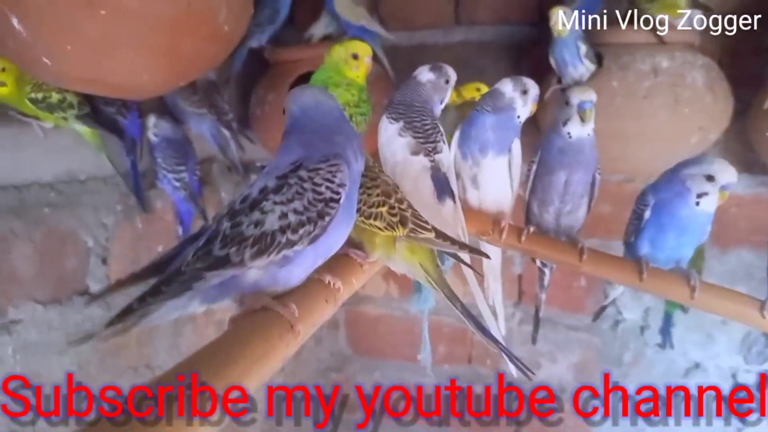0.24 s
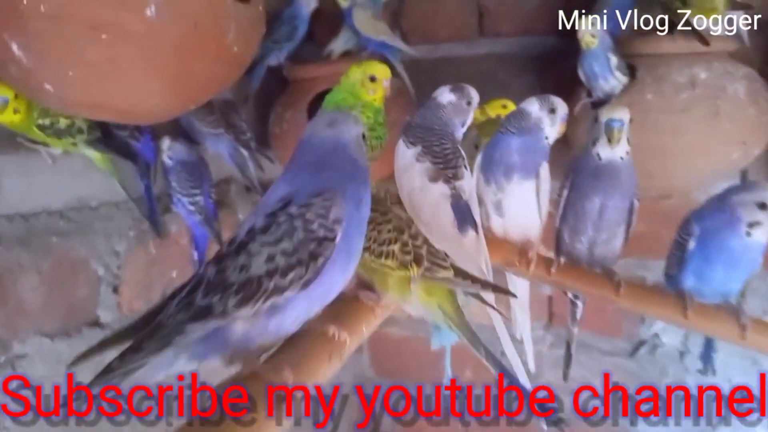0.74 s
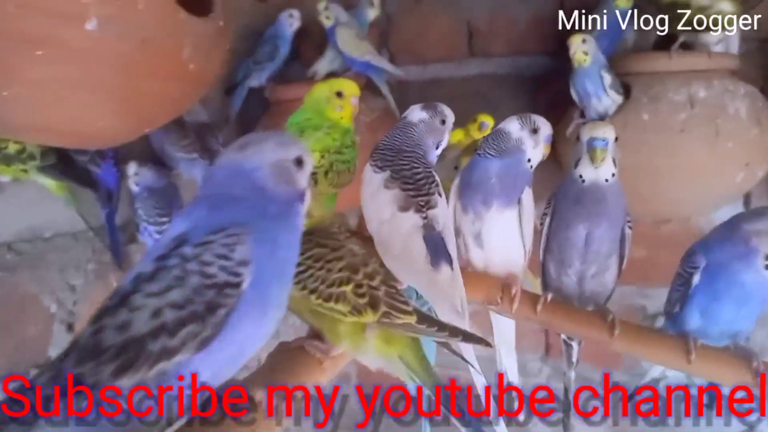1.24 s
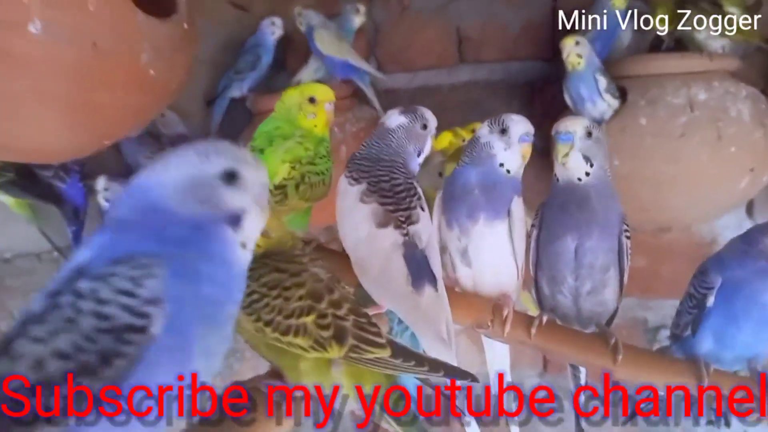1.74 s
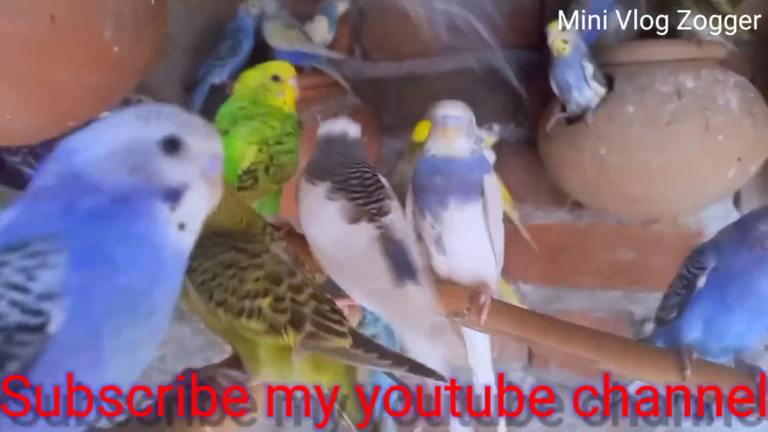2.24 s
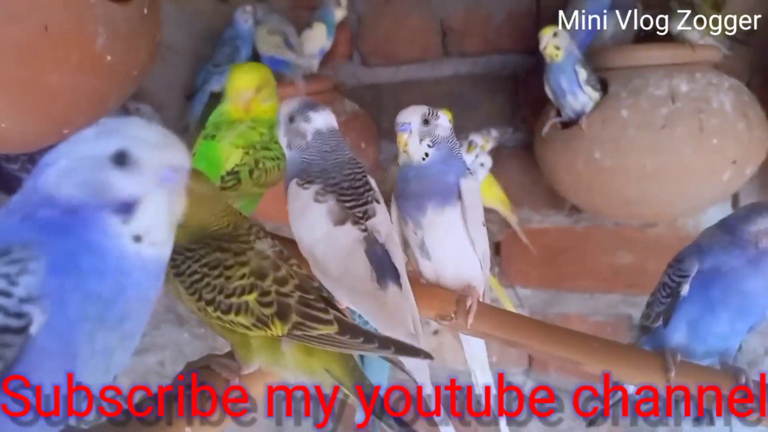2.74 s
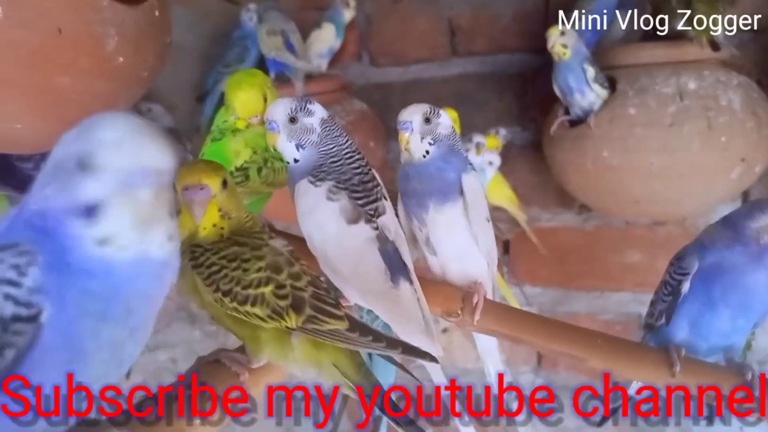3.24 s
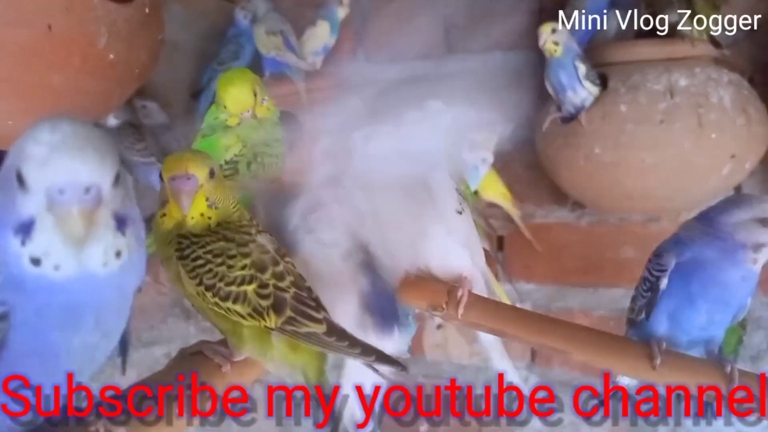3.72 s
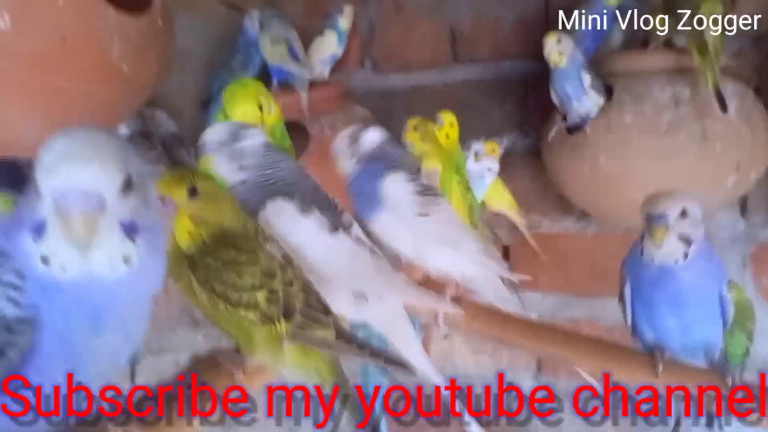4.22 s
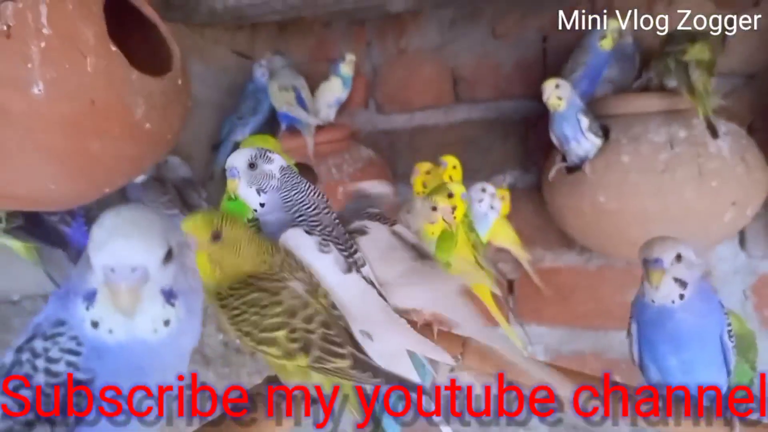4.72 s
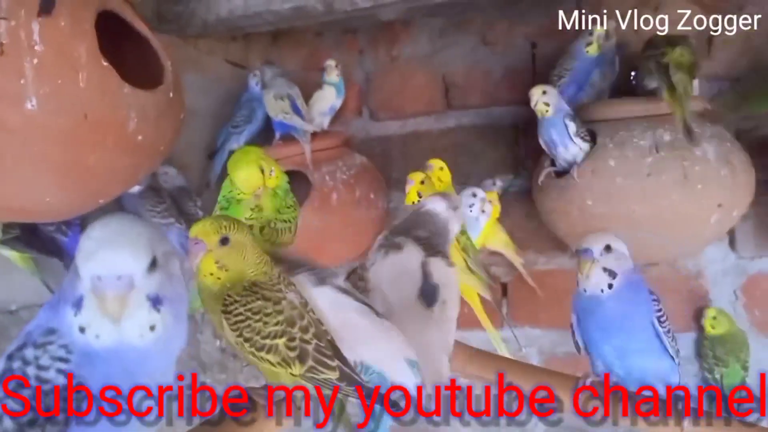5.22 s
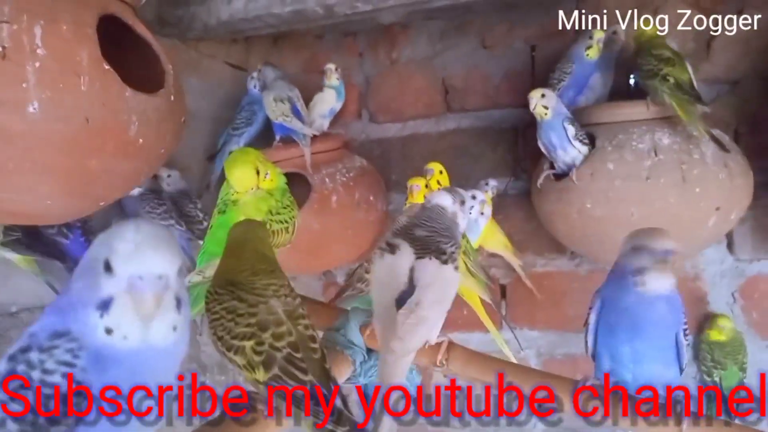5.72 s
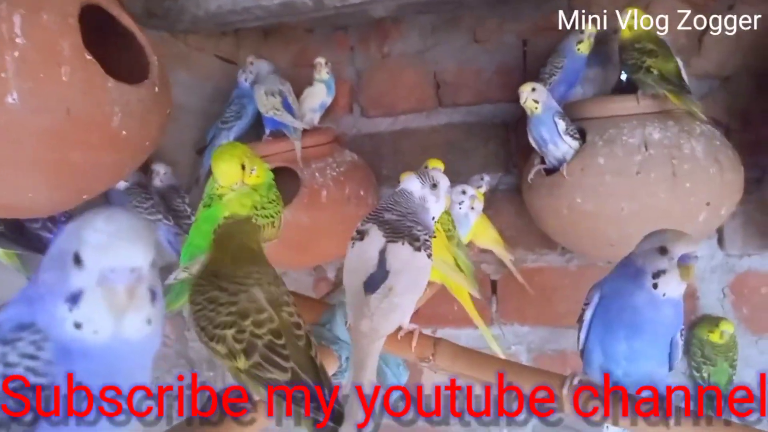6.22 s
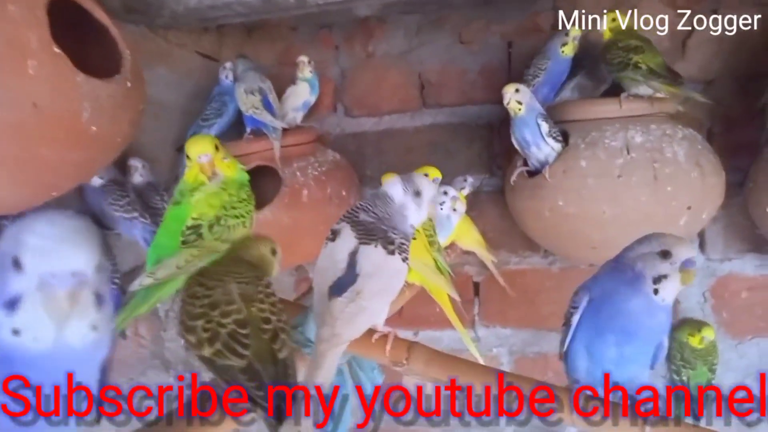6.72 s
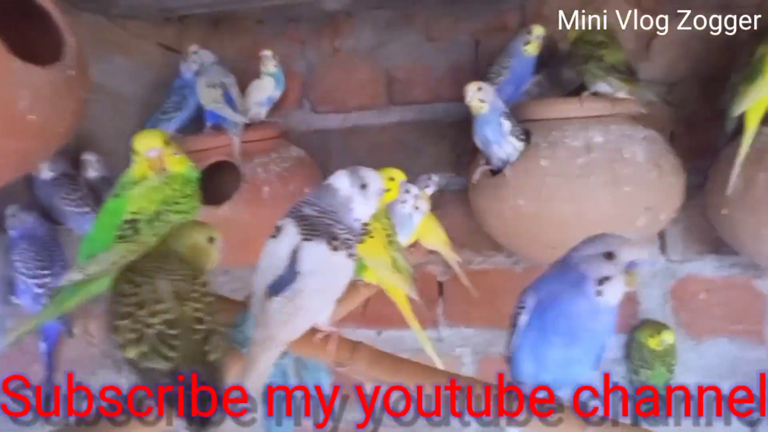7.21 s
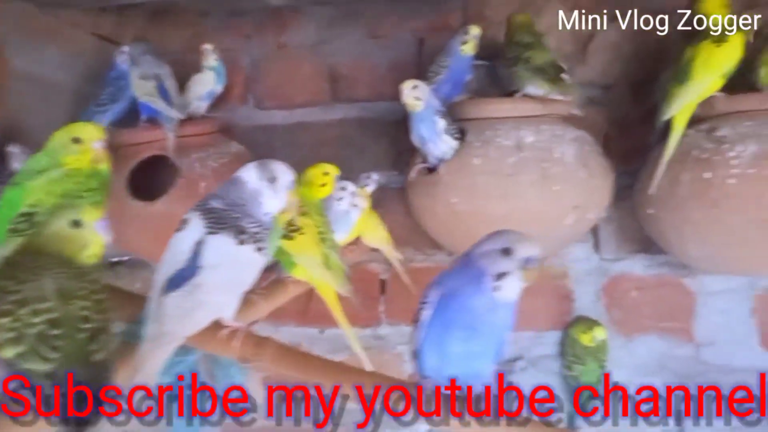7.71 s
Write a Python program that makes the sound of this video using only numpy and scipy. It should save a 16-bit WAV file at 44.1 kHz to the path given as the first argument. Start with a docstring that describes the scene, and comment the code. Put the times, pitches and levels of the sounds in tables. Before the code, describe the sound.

Close-up small parrots chirp and squawk busily over fainter flock calls and wing flutters, until only a few very faint notes remain.

```python
"""A flock of budgerigars chatters in a small brick aviary: gliding chirps and warbles, summed from sine partials,
overlap with harsh squawks made of shaped noise and a ragged whistle. Other birds call from farther back.
Birds flutter between perches and scratch on wood and clay pots: shaped noise, and decaying sines for the pots.
Brick walls and cage wires answer at close range, over a faint rumble and hiss; the microphone cuts the top treble.
After six seconds only a few soft calls are left."""
import sys
import numpy as np
from scipy import signal
from scipy.fft import rfft, irfft, next_fast_len
from scipy.io import wavfile
from scipy.ndimage import uniform_filter1d, map_coordinates

SR = 44100
rng = np.random.default_rng(int(sys.argv[2]) if len(sys.argv) > 2 else 0)


def log_audio(samples):
    """Write samples as a 16-bit WAV file to the path given in sys.argv[1]."""
    # one column per channel
    frames = np.atleast_2d(samples).T
    # limit to full scale, then quantise
    limited = np.clip(frames, -1, 1)
    pcm = np.round(limited * 32767).astype(np.int16)
    wavfile.write(sys.argv[1], SR, pcm)


N = 351036  # samples

# Levels are relative: the share sent to the walls and the balance in scene() come on top.
# Single chirps that stand out. Each row: start in seconds, nominal length in seconds, middle pitch in Hz,
# level in dB, name of the syllable.
CHIRPS = [(0, 0.042, 3480, -33.5, "arch"), (.34, 0.082, 2764, -43, "arch"), (.61, 0.056, 2850, -49, "sag"),
          (.675, 0.043, 2820, -38, "fall"), (.72, 0.058, 2600, -45.5, "arch"),
          (.9, 0.01, 3035, -27.5, "hold"), (.911, 0.025, 4030, -26.5, "fall"),
          (.931, 0.019, 2940, -21, "sag"), (.964, 0.0091, 2340, -21, "dip"),
          (.974, 0.029, 3020, -21, "rise"), (.996, 0.028, 3415, -37, "sag"),
          (1.13, 0.037, 2320, -39.5, "hold"), (1.175, 0.035, 3184, -35, "dip"),
          (1.205, 0.031, 4260, -38, "rise"), (1.352, 0.067, 2250, -32, "swoop"),
          (1.425, .05, 2266, -39.5, "hold"), (1.48, 0.16, 1480, -47.5, "swoop"),
          (1.56, 0.076, 3074, -29.5, "burr"), (1.64, 0.05, 3004, -31, "burr"),
          (1.74, 0.11, 2553, -32.5, "burr"), (2.093, 0.023, 3846, -23, "arch"),
          (2.14, 0.023, 2680, -20.5, "dip"), (2.36, 0.035, 2240, -41, "rise"),
          (2.45, .13, 1473, -50.5, "sag"), (2.755, 0.064, 3387, -33.5, "burr"),
          (2.857, 0.012, 2830, -22.5, "hold"), (2.872, 0.045, 3630, -26.5, "sag"),
          (2.895, 0.015, 2900, -19, "hold"), (2.925, .016, 2380, -22.5, "dip"),
          (2.94, .02, 2825, -19.5, "sag"), (2.96, 0.039, 3244, -24.5, "burr"),
          (3.285, .018, 2244, -37.5, "rise"), (3.563, 0.052, 3370, -35, "burr"),
          (3.62, .055, 3210, -37.5, "burr"), (3.685, 0.024, 2417, -39, "swoop"),
          (3.72, 0.063, 2080, -34.5, "hold"), (3.78, 0.035, 3460, -31, "sag"),
          (3.836, 0.019, 3350, -27, "hold"), (3.858, .068, 2854, -44, "fall"),
          (3.933, .036, 3106, -32, "dip"), (3.97, 0.031, 2730, -35, "rise"),
          (4.14, 0.083, 2633, -29, "burr"), (4.335, 0.038, 3570, -32, "sag"),
          (4.455, 0.027, 2300, -28, "dip"), (4.765, 0.042, 1381, -44, "hold"),
          (4.817, 0.0076, 3660, -30.5, "hold"), (5.01, 0.053, 2863, -30, "arch"),
          (5.165, 0.025, 3000, -35.5, "arch"), (5.47, 0.062, 1500, -51, "swoop"),
          (5.748, 0.011, 2430, -25.5, "hold"), (5.775, 0.035, 2894, -31, "arch"),
          (6.045, 0.066, 2100, -51.5, "swoop"), (6.09, .035, 1945, -44.5, "rise"),
          (6.118, 0.048, 2440, -37.5, "arch"), (6.188, 0.043, 2488, -33.5, "arch"),
          (6.218, 0.026, 2960, -37.5, "rise"), (7.135, 0.02, 2480, -51.5, "dip"),
          (7.163, 0.0417, 2083, -51.5, "dip"), (7.205, 0.053, 3010, -53, "sag"),
          (7.39, 0.062, 2835, -70, "rise")]
# Lower, nasal calls with strong overtones. Each row: start in seconds, nominal length in seconds,
# middle pitch in Hz, level in dB, name of the syllable.
NASAL_CALLS = [(.11, 0.035, 2600, -35.5, "hold"), (.295, 0.054, 1900, -50, "fall"),
               (.43, 0.043, 1330, -54.5, "fall"), (2.5, 0.17, 801, -49, "sag"),
               (3.41, 0.0275, 2080, -38, "hold"), (3.48, 0.028, 2154, -33.5, "hold"),
               (4.745, 0.13, 910, -51, "hold"), (7.208, 0.0373, 769, -57.5, "sag"),
               (7.765, .03, 1850, -55, "rise"), (7.792, 0.0756, 1400, -52.5, "sag"),
               (7.9, 0.035, 2000, -50, "hold")]
# The syllables of a budgerigar. Each name: start and end in semitones from the middle pitch, roughness from 0 to 1.
SYLLABLES = {"swoop": (4.6, -3.5, .08), "fall": (3.2, -2.5, .16), "sag": (1.4, -0.8, 0.2),
             "rise": (-2.6, 2, 0.14), "arch": (-2.6, -2.4, 0.27), "dip": (3.4, 3.4, 0.11),
             "hold": (-0.47, -0.28, 0.16), "burr": (0, -0.8, .45)}
# Warbles, quick runs of arches and dips. Each row: start in seconds, length in seconds, central pitch in Hz,
# level in dB.
WARBLES = [(1.962, 0.062, 2890, -29.5), (2.041, .14, 2814, -26), (2.604, 0.17, 2588, -33),
           (2.994, .15, 2319, -35.5), (3.147, 0.11, 1523, -48), (4.365, 0.052, 2773, -31.5),
           (4.571, .12, 2400, -35), (5.666, 0.076, 2578, -34.5), (6.375, 0.18, 2457, -66)]
WARBLE_SYLLABLE_S, WARBLE_ROUGHNESS = .029, 0.29  # nominal seconds, 0-1
WARBLE_SWING, WARBLE_DRIFT = 1.5, .6  # semitones
# The throat and beak favour some partials. Each row: frequency in Hz, gain in dB.
THROAT = [(600, 0), (1300, 8.5), (2100, 11.5), (3000, 7), (4200, 2), (5600, -7.5), (6800, -8.5),
          (9000, -11.5), (11500, -39), (14500, -23), (17000, -17.5)]
# Squawks. Each row: onset in seconds, nominal length in seconds, whistle pitch in Hz, level in dB, name of the voice.
SQUAWKS = [(.108, .05, 5265, -39, "shrill"), (0.906, 0.055, 7540, -38, "shrill"),
           (1.076, .064, 6570, -29, "full"), (1.255, 0.058, 4840, -30, "shrill"),
           (1.379, 0.046, 6020, -30, "hoarse"), (1.49, .031, 4190, -29.5, "full"),
           (1.677, 0.048, 5425, -33, "shrill"), (1.763, 0.083, 4930, -31, "full"),
           (1.873, 0.083, 4165, -26, "full"), (2.004, 0.083, 4200, -30.5, "hoarse"),
           (2.202, 0.083, 5040, -26, "full"), (2.849, 0.13, 5390, -39, "hoarse"),
           (4.062, 0.096, 5710, -26, "hoarse"), (4.21, .11, 6150, -24, "full"),
           (4.375, 0.078, 6270, -25.5, "full"), (4.415, 0.16, 6130, -29.5, "hoarse"),
           (4.584, .14, 5580, -27, "hoarse"), (4.857, .11, 6220, -23.5, "full"),
           (5.008, .1, 6080, -25, "full"), (5.099, 0.14, 4900, -27, "hoarse"),
           (5.197, 0.12, 6330, -24.5, "full"), (5.367, 0.086, 6325, -25, "full"),
           (5.539, 0.1, 6170, -25, "shrill"), (5.652, 0.062, 7080, -27.5, "full"),
           (5.814, 0.071, 6045, -28, "shrill"), (5.957, .073, 6030, -31, "full")]
# How a squawk is voiced. Each name: whistle over rasp in dB.
VOICES = {"shrill": 7.7, "full": 0, "hoarse": -5.5}
# Spectrum of the squawks' rasp. Each row: frequency in Hz, relative level in dB.
RASP = [(600, -47.5), (1300, -36), (2200, -9), (3000, -1.5), (4200, -2.5), (5600, 0.5), (6700, -4),
        (7800, -12), (9600, -14), (11500, -30), (12800, -26.5), (14500, -16.5), (16000, -26.5)]
# The birds farther back. Each row: time in seconds, level in dB.
FLOCK = [(0.0, -53), (0.38, -57.5), (0.97, -52.5), (1.06, -48.5), (2.08, -33), (2.39, -35), (2.61, -44.5),
         (2.86, -33), (3.26, -49), (3.48, -40.5), (3.68, -38), (4.34, -32), (4.83, -38), (5.08, -31.5),
         (6.08, -54.5), (6.27, -74), (6.85, -84.5), (7.96, -58.5)]
# Bouts of flapping. Each row: start in seconds, length in seconds, pushed air in dB, feather swish in dB.
FLUTTERS = [(1.963, 0.41, -58, -72.5), (2.975, .05, -55, -55), (3.02, 0.2, -63, -48),
            (3.13, 0.32, -53, -50.5), (3.347, 0.97, -64.5, -63), (3.999, .44, -58.5, -60),
            (4.377, .22, -62, -59), (4.501, 0.49, -58.5, -67), (4.953, 0.89, -64, -69.5),
            (5.652, 0.49, -62.5, -73.5)]
# Spectrum of the air pushed by a wing. Each row: frequency in Hz, relative level in dB.
WING_AIR = [(20, -21), (45, -15.5), (70, 7), (110, -3.5), (170, -14.5), (300, -21.5), (800, -77.5)]
# Spectrum of the feathers' swish. Each row: frequency in Hz, relative level in dB.
FEATHERS = [(80, -17), (170, -1), (260, -10), (420, 4.5), (700, -2), (1500, 5.5), (4000, -25.5),
            (9000, -28), (16000, -37.5)]
# Claws and feathers brush perches and pots. Each row: start in seconds, nominal length in seconds, level in dB.
SCRATCHES = [(0.498, 0.038, -69), (0.802, 0.032, -56), (3.228, 0.067, -47), (3.559, 0.02, -36.5),
             (3.752, 0.18, -42.5), (6.283, 0.21, -79), (6.503, 0.038, -69), (6.725, .13, -72),
             (6.97, 0.037, -66), (7.479, 0.038, -68.5), (7.551, 0.056, -70), (7.638, 0.054, -61)]
# Spectrum of a scratch. Each row: frequency in Hz, relative level in dB.
CLAWS = [(200, -37.5), (500, -19), (1200, -12), (2400, 14), (4500, 0.5), (9000, -16.5), (16000, -28)]
# Birds land on the pots, which ring hollowly. Each row: start in seconds, level in dB.
LANDINGS = [(3.124, -58), (3.26, -39), (3.313, -47), (4.46, -43.5), (4.509, -43.5)]
# Modes of a pot of middling size. Each row: frequency in Hz, level in dB, time to fall 60 dB in seconds.
POT = [(422, -0.5, .13), (312, -8, 0.11), (580, -8, 0.084), (164, -6.5, 0.2)]
# Decay of the aviary's echo. Each row: frequency in Hz, time to fall 60 dB in seconds.
ROOM = [(200, 0.073), (2500, 0.16), (7000, 0.12), (15000, 0.046)]
# Spectrum of the surroundings. Each row: frequency in Hz, relative level in dB.
AMBIENT = [(45, -19.5), (70, -4), (90, 2), (115, -5), (200, -12.5), (400, -14), (800, -14.5), (1400, -26),
           (2400, -25.5), (4000, -26), (8000, -36), (16000, -43.5)]
TOP_HZ = 15650  # middle of the microphone's upper band edge


def syllables(table):
    """Each syllable bends around its own pitch: rows (s, length, start Hz, middle Hz, end Hz, dB, roughness)."""
    rows = []
    for s, length, hz, db, name in table:
        start, end, rough = SYLLABLES[name]
        rows.append((s, length, hz * interval(start), hz, hz * interval(end), db, rough))
    return rows


def warbles(scatter_db=-1.5):
    """A warble swings up and down around its pitch, one arch or dip after another, no two quite alike."""
    rows = []
    for s, length, hz, db in WARBLES:
        count = max(round(length / WARBLE_SYLLABLE_S), 1)
        for i, (drift, tilt, strength) in enumerate(rng.standard_normal((count, 3))):
            swing = WARBLE_SWING * (-1) ** i * np.array([-1, 1, -1])
            wander = WARBLE_DRIFT * (drift + tilt * np.array([-1, 0, 1]))
            pitches = hz * interval(swing + wander)
            start = s + i * length / count
            level_db = db + scatter_db * strength
            rows.append((start, WARBLE_SYLLABLE_S, *pitches, level_db, WARBLE_ROUGHNESS))
    return rows


def chirp(length, start_hz, middle_hz, end_hz, rough, slope_db=-9, jitter=0.21, shimmer_db=6.0):
    """One glide of the syrinx; a rough membrane shakes in pitch and strength, and each partial flickers."""
    u, envelope = swell(length, rise=0.0044, fall=0.0028)
    # a parabola in log pitch through start, middle and end
    glide = np.polyfit([0, .5, 1], np.log([start_hz, middle_hz, end_hz]), 2)
    hz = np.exp(np.polyval(glide, u))
    hz = hz * np.exp(.016 * wobble(123.4, len(u)) + jitter * rough * wobble(1100, len(u)))
    k = np.arange(1, 9)[:, None]  # partial numbers
    flicker_db = wobble(110, len(k) * len(u)).reshape(len(k), -1) * np.where(k > 1, 5, 3)
    partials = amp(along(THROAT, k * hz) + slope_db * np.log2(k) + flicker_db)
    partials = partials * (k * hz < SR / 2)
    phase = 2 * np.pi * np.cumsum(hz) / SR
    voice = np.sum(partials * np.sin(k * phase), axis=0)
    shimmer = amp(shimmer_db * rough * wobble(450, len(u)))
    return envelope * unit(voice * (1.2 + np.sin(np.pi * u)) * shimmer)


def calls(table, slope_db, even_db=-46, distance_db=0.5, bounce=0.34, bounce_s=0.0062):
    """Direct sound and the share sent to the walls: weak calls come from farther off and are wetter."""
    direct, sent = np.zeros(N), np.zeros(N)
    for s, length, start_hz, middle_hz, end_hz, db, rough in table:
        call = amp(db) * chirp(length, start_hz, middle_hz, end_hz, rough, slope_db)
        angle = np.arctan(amp(distance_db * (even_db - db)))  # equal shares at even_db
        add(direct, s, np.cos(angle) * call)
        # the nearest wall's late copy beats against the glide
        add(direct, s + bounce_s * rng.uniform(0.4, 2), bounce * np.cos(angle) * call)
        add(sent, s, np.sin(angle) * call)
    return direct, sent


def squawks(buzz_rate=420, buzz_db=1.5, spread=0.047, arch=.07, opening=0.16, lower_db=-11, upper_db=-19):
    """A hard-driven syrinx sputters: broad rasp and a ragged whistle on the second partial.
    As the beak opens and closes, the call swells and its resonances rise and fall."""
    out = np.zeros(N)
    rasp = unit(patchy(noise(RASP), 5.5))
    for s, length, whistle_hz, db, voice in SQUAWKS:
        u, envelope = swell(length + 0.0073, rise=0.008, fall=.022)
        beak = np.abs(np.sin(np.pi * u ** 0.95))
        raggedness = 0.0158 * wobble(90, len(u)) + spread * wobble(1900, len(u))
        hz = whistle_hz * (1 + arch * (beak - .7) + raggedness)
        phase = np.pi * np.cumsum(hz) / SR  # of the first partial, an octave below the whistle
        whistle = np.sin(2 * phase) + amp(lower_db) * np.sin(phase) + amp(upper_db) * np.sin(3 * phase)
        whistle = unit(whistle * (0.17 + beak) * amp(3.8 * wobble(260, len(u))))
        # reading the rasp faster or slower moves its resonances up or down
        place = np.cumsum(1 + opening * (beak - .75))
        hiss = map_coordinates(rasp[int(s * SR):][:2 * len(u)], [place])
        hiss = unit(hiss * (1.1 + beak))
        sputter = unit(amp(buzz_db * wobble(buzz_rate, len(u))))
        cry = unit(hiss + amp(VOICES[voice]) * whistle)
        add(out, s - .008, amp(db) * envelope * sputter * cry)
    return out


def far_chirps(count=190, pitch_hz=2650, range_share=0.14, glide=0.19, rough=0.17):
    """Birds farther back call at random, each at its own pitch."""
    out = np.zeros(N)
    for i, (when, length, db, pitch, *bend) in enumerate(rng.standard_normal((count, 7))):
        pitches = pitch_hz * np.exp(range_share * pitch + glide * np.array(bend))
        call = chirp(.033 * np.exp(.3 * length), *pitches, rough, slope_db=-4)
        level_db = 2 * db + 2 * along(THROAT, pitches.min())
        add(out, (i + when / 2) * N / SR / count, amp(level_db) * call)
    return unit(out) * amp(curves(FLOCK)[0])


def far_mutters(count=48, pitch_hz=1250, range_share=.25, glide=.08, rough=.2, length_s=.04, follow=.45, level_db=-60):
    """Low nasal notes from farther back, a little louder when the flock is busy."""
    out = np.zeros(N)
    for i, (when, length, pitch, fall) in enumerate(rng.standard_normal((count, 4))):
        pitches = pitch_hz * np.exp(range_share * pitch + glide * (1 + fall) * np.array([1, 0, -1]))
        note = chirp(length_s * np.exp(.3 * length), *pitches, rough, slope_db=2)
        add(out, (i + when / 2) * N / SR / count, note)
    flock_db = curves(FLOCK)[0]
    busy_db = follow * (flock_db - np.median(flock_db)) + level_db
    return unit(out) * amp(np.minimum(busy_db, flock_db - 10.5))


def wings(beat_rate=16.2, air_beat_db=5, swish_beat_db=2.0, uneven_db=4.5, uneven_rate=22):
    """Every wingbeat pushes air, no two equally hard; the feathers swish. A bout swells and fades as the bird passes."""
    out = np.zeros(N)
    for s, length, air_db, swish_db in FLUTTERS:
        u = np.linspace(0, 1, int(length * SR))
        beats_per_s = beat_rate * (1 + 0.13 * wobble(9.6, len(u)))
        stroke = np.cos(2 * np.pi * np.cumsum(beats_per_s) / SR)
        effort = amp(uneven_db * wobble(uneven_rate, len(u)))
        puffs = effort * amp(air_beat_db * stroke) * coloured(rng.standard_normal(len(u)), WING_AIR)
        air = amp(air_db) * unit(puffs)
        feathers = coloured(patchy(rng.standard_normal(len(u)), 6), FEATHERS)
        swish = amp(swish_db) * unit(amp(swish_beat_db * stroke) * feathers)
        add(out, s, np.sin(np.pi * u) * (air + swish))
    return out


def scratches(grain_rate=300, grain_db=4):
    """A claw or feather catches and slips many times in each stroke."""
    out = np.zeros(N)
    for s, length, db in SCRATCHES:
        u, envelope = swell(length, rise=0.0086, fall=0.019)
        slips = patchy(rng.standard_normal(len(u)), 4.3) * amp(grain_db * wobble(grain_rate, len(u)))
        add(out, s, amp(db) * envelope * coloured(slips, CLAWS))
    return out


def landings(attack=0.0018):
    """Soft feet set a clay pot ringing; its size, and so its pitch, varies a little between landings."""
    out = np.zeros(N)
    t = np.arange(SR // 4) / SR
    for s, db in LANDINGS:
        size = np.exp(0.039 * rng.standard_normal())
        ring = sum(amp(level - 60 * t / t60) * np.sin(2 * np.pi * hz / size * t) for hz, level, t60 in POT)
        add(out, s, amp(db) * (1 - np.exp(-t / attack)) * ring)
    return out


def aviary(x, count=48, first_echo=0.0036):
    """Close brick walls and hollow pots answer; the echo changes as the birds move about."""
    out = np.zeros(N)
    edges = np.linspace(0, N, count + 1).astype(int)
    step = edges[1]
    for edge in edges:
        hz, t, z = signal.stft(patchy(rng.standard_normal(SR // 4), 7), SR, nperseg=256)
        decay = amp(-60 * t / along(ROOM, hz)[:, None])
        tail = signal.istft(z * decay, SR, nperseg=256)[1]
        # each stretch fades into the next, which has a tail of its own
        i = np.arange(max(edge - step, 0), min(edge + step, N))
        part = x[i] * np.cos(np.pi / 2 * (i - edge) / step)
        add(out, i[0] / SR + first_echo, signal.fftconvolve(part, tail / np.linalg.norm(tail)))
    return out


def wires(x, count=30, low_hz=3300, high_hz=10500, t60=0.14, level_db=-11):
    """The cage wires ring briefly in sympathy whenever a partial sweeps past one of their pitches."""
    t = np.arange(SR // 4) / SR
    place, turn = rng.random((2, count, 1))
    hz = low_hz * (high_hz / low_hz) ** ((np.arange(count)[:, None] + place) / count)
    ring = np.sum(np.sin(2 * np.pi * (hz * t + turn)), axis=0) * amp(-60 * t / t60)
    return amp(level_db) * signal.fftconvolve(x, ring / np.linalg.norm(ring))[:N]


def background():
    """The faint rumble and hiss of the surroundings: steady noise, strongest in the bass."""
    return amp(-83) * noise(AMBIENT)


def amp(db):
    """Amplitude factor of a level in dB."""
    return 10 ** (np.asarray(db) / 20)


def interval(semitones):
    """Frequency ratio of a pitch step."""
    return 2 ** (semitones / 12)


def unit(x):
    """x scaled to rms 1."""
    return x / np.sqrt(np.mean(x ** 2) + 1e-20)


def along(points, hz):
    """Values at hz, read between (Hz, value) points on a log axis."""
    f, v = np.transpose(points)
    return np.interp(np.log(hz + 1), np.log(f), v)


def curves(rows):
    """One value per sample for each column after the time."""
    s, *cols = np.transpose(rows)
    return [np.interp(np.arange(N) / SR, s, c) for c in cols]


def wobble(rate, size):
    """A smooth random curve, rate knots a second."""
    knots = np.random.default_rng(rng.integers(2 ** 31)).standard_normal(int(size * rate / SR) + 4)
    return map_coordinates(knots, [np.arange(size) * rate / SR], mode="nearest")


def swell(length, rise, fall):
    """Progress 0-1 through a call, and its envelope."""
    t = np.arange(int((max(length, rise) + fall / 2) * SR)) / SR
    edge = np.clip(t / rise, 0, 1) * np.clip((t[-1] - t) / fall, 0, 1)
    return t / t[-1], np.sin(np.pi / 2 * edge) ** 2


def coloured(x, spectrum):
    """x shaped by a spectrum, at rms 1."""
    m = next_fast_len(len(x) + 2048)
    gain = amp(along(spectrum, np.fft.rfftfreq(m, 1 / SR)))
    return unit(irfft(rfft(x, m) * gain, m)[:len(x)])


def noise(spectrum):
    """Steady noise of rms 1."""
    return coloured(rng.standard_normal(N), spectrum)


def patchy(x, depth_db, order=3):
    """Random peaks and troughs, a few hundred Hz wide and some 20 ms long."""
    z = signal.stft(x, nperseg=256)[2]
    field = rng.standard_normal(z.shape)
    for _ in range(2):
        field = uniform_filter1d(uniform_filter1d(field, order, axis=0), 2 * order, axis=1)
    gain = amp(depth_db * np.clip(unit(field), -2, 2))
    return signal.istft(z * gain, nperseg=256)[1][:len(x)]


def add(track, s, sound):
    """Mix a sound into the track at time s."""
    start = int(np.clip(s * SR, 0, N))
    track[start:start + len(sound)] += sound[:N - start]


def scene():
    """Near birds, far birds, wings and the answer of walls and wires over a faint rumble."""
    chirps, chirps_sent = calls(syllables(CHIRPS) + warbles(), slope_db=-11.5, even_db=-50.5, distance_db=.3)
    nasal, nasal_sent = calls(syllables(NASAL_CALLS), slope_db=1.5, even_db=-56)
    harsh = amp(-2.5) * squawks() + scratches()
    far = amp(-8) * far_chirps() + far_mutters()
    near = chirps + nasal + harsh
    echo = aviary(amp(-1.5) * (chirps_sent + nasal_sent) + amp(-7) * harsh + amp(-2) * far)
    ringing = wires(chirps + nasal + far + amp(-8.5) * harsh)
    return (near + amp(-1) * far + echo + ringing + wings() + landings() + background())[None]


def record(dry):
    """The microphone falls off steeply at its band limit."""
    m = next_fast_len(N + SR // 2)
    passband = np.clip((TOP_HZ - np.fft.rfftfreq(m, 1 / SR)) / 300 + .5, 0, 1)  # edge 300 Hz wide
    return irfft(rfft(dry, m) * np.sin(np.pi / 2 * passband) ** 2, m)[..., :N]


dry = scene()
out = record(dry)
log_audio(out)
```